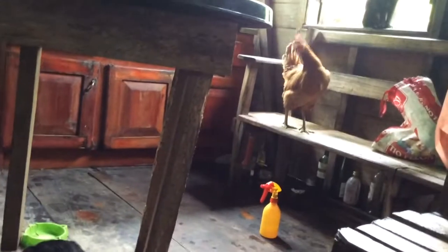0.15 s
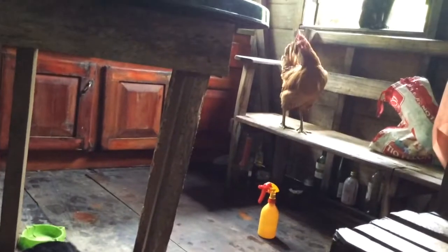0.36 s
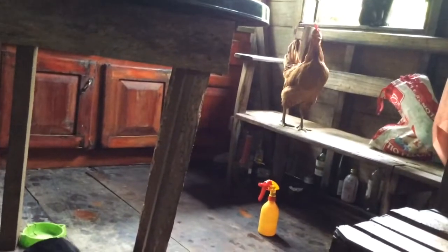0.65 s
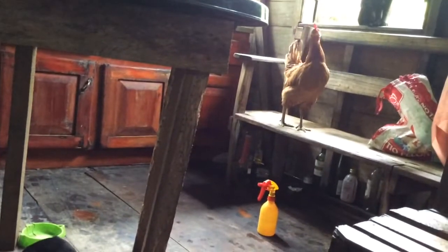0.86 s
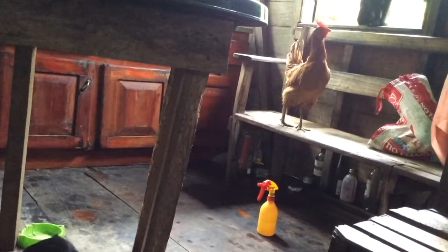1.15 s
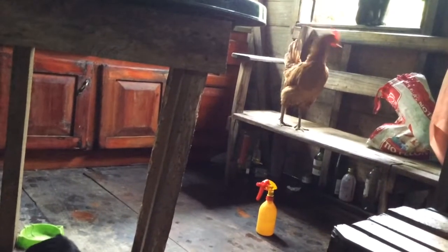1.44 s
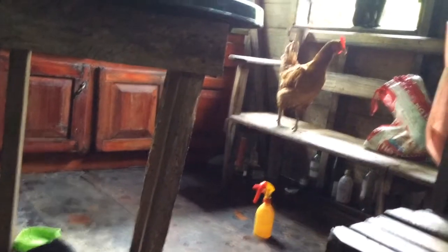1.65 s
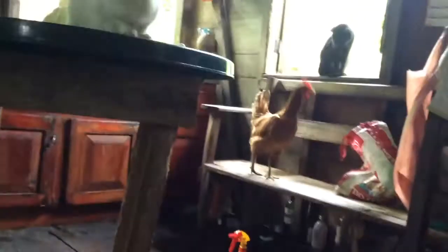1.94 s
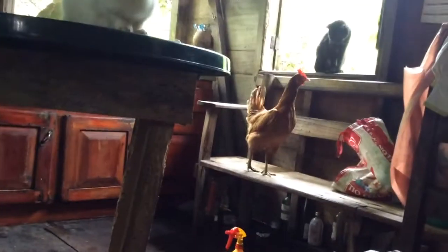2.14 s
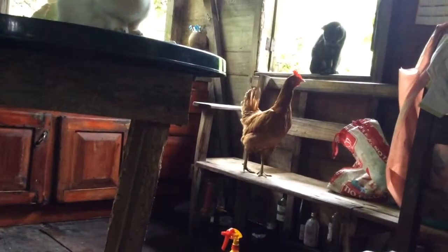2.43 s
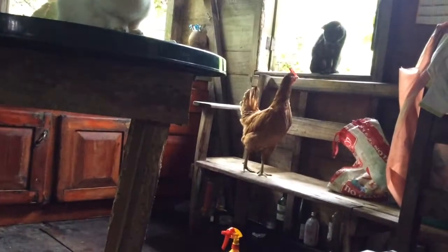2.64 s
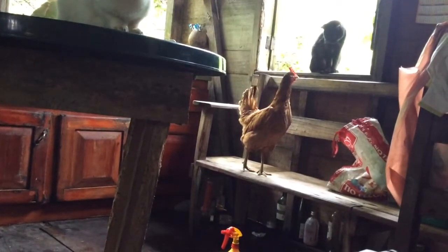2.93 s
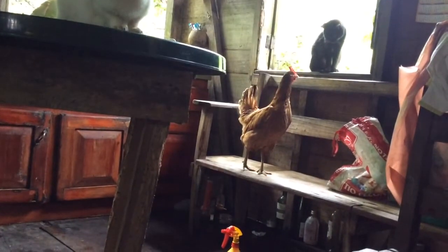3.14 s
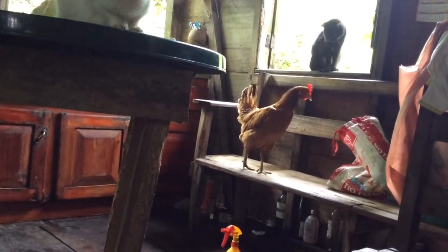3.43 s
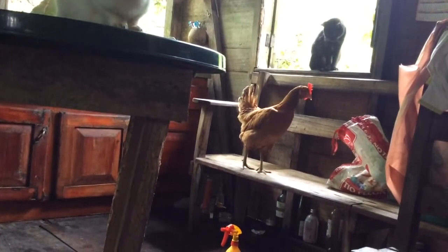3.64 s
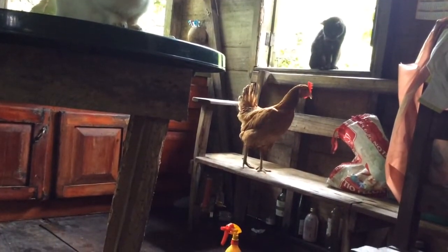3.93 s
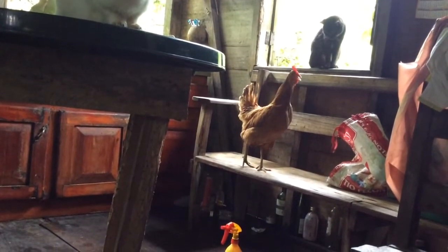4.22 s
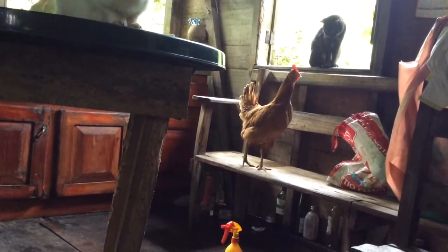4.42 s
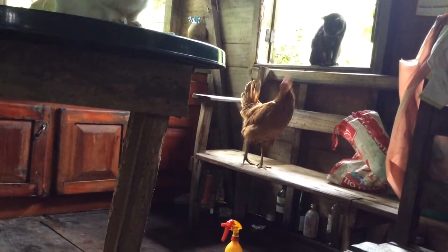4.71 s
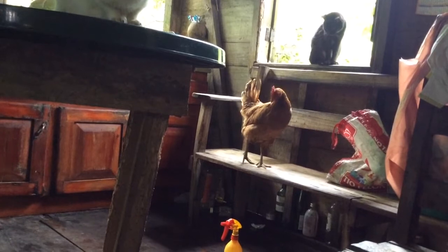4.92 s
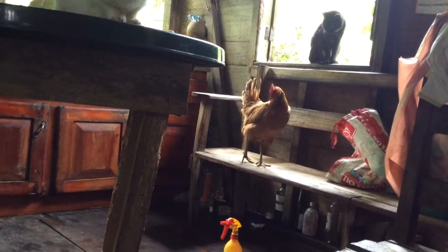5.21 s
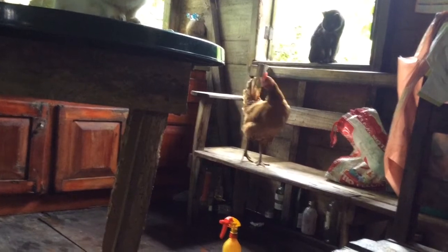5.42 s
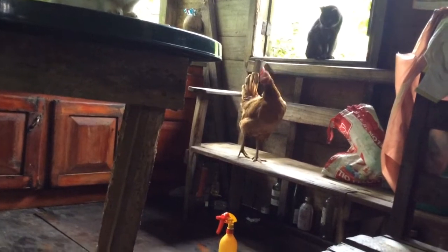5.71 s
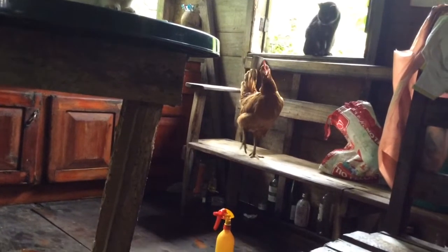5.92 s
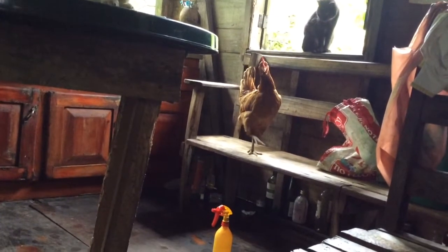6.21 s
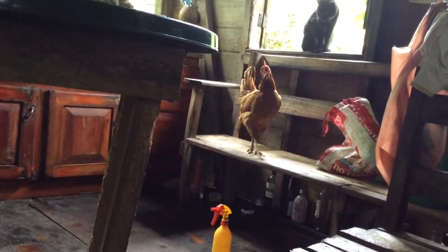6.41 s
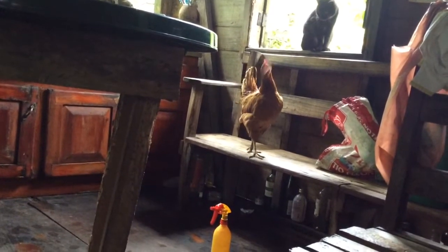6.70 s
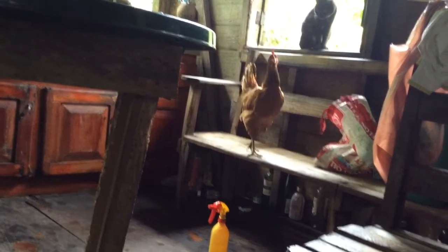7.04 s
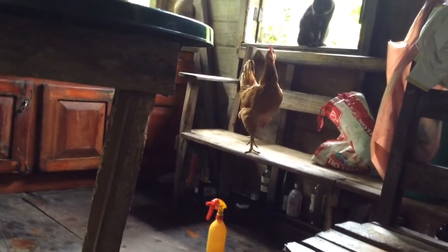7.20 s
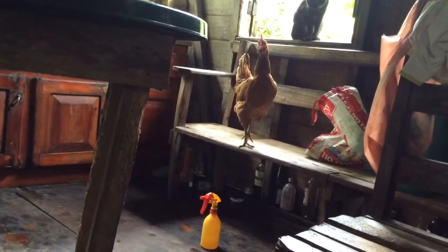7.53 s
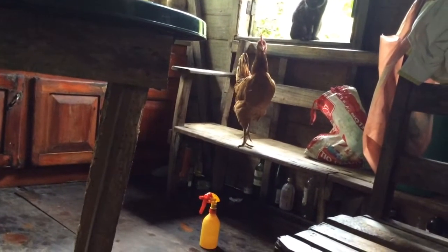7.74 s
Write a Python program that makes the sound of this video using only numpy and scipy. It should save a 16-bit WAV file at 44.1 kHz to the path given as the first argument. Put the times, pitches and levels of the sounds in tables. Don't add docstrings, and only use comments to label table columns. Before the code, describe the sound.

Short, throaty hen clucks at a few steps' distance, two harsh high squawks, and a brief room ring over faint low hum.

```python
import sys
import numpy as np
from scipy import signal
from scipy.fft import rfft, irfft, next_fast_len
from scipy.io import wavfile
from scipy.ndimage import uniform_filter1d, map_coordinates

SR = 44100
rng = np.random.default_rng(int(sys.argv[2]) if len(sys.argv) > 2 else 0)


def store_pcm(level_fs):
    pcm = np.round(np.clip(level_fs, -1, 1) * 32767).astype(np.int16)
    wavfile.write(sys.argv[1], SR, np.atleast_2d(pcm).T)


def amplitude_ratio(level_db):
    exponent = np.asarray(level_db, float) / 20
    return 10 ** exponent


N = 347067

# (frequency [Hz], level [dB per Hz])
HUSH_SPECTRUM = [(74, -31), (125, -3.5), (244, -2.5), (275, -5.5), (324, -5), (671, -1), (773, -6),
                 (909, -8.5), (1110, -5.5), (1570, -12.5), (2000, -11.5), (4070, -13.5), (5740, -16.5),
                 (13700, -17), (15800, -43)]
# (frequency [Hz], level [dB per Hz])
RUMBLE_SPECTRUM = [(15, -57.5), (30, -21), (81, -3.5), (130, -15), (170, -20), (290, -120)]
# (start [s], length [s], level [dB], pitch [Hz])
DRONE_SWELLS = [(0.138, 0.11, -59, 104), (.6, 0.16, -59, 101), (1.045, 0.8, -60.5, 98),
                (1.551, .24, -56, 101), (1.988, .2, -57.5, 104), (2.54, 0.2, -55.5, 101),
                (2.933, 0.2, -53, 102), (4.35, 0.27, -59, 101), (4.846, .2, -59, 102.3),
                (5.32, 0.7, -52, 101.5), (5.364, 0.63, -56, 65.7), (6.2, .22, -54, 102.7),
                (7.2, 0.79, -58.5, 81.3)]
# (frequency [Hz], time to fall by 60 dB [s])
KITCHEN_RING = [(250, 0.34), (600, 0.19), (1100, 0.25), (3500, 0.23), (10000, 0.25)]
# (time [s], level [dB], pitch [Hz], length [s], beak opening [dB])
CLUCKS = [(0.168, -33.5, 316.6, .055, -1.2), (0.417, -24.5, 351.4, .041, -4.5),
          (0.862, -30, 292.1, 0.052, 2.5), (2.009, -40.5, 198.1, 0.052, -5),
          (2.238, -39, 242.5, 0.055, 1.6), (2.532, -36.5, 254.5, 0.049, -1),
          (2.764, -31.5, 324.4, 0.044, -0.5), (3.002, -36, 263.4, 0.051, -1),
          (3.251, -30, 334.2, 0.04, -0.2), (3.506, -30.5, 376.2, 0.051, 0),
          (3.797, -27.5, 378.9, 0.054, 1.2), (4.035, -24.5, 388, 0.048, 0.5), (4.445, -31, 300.6, 0.06, 2),
          (5.448, -42.5, 294.4, .056, 0), (5.705, -38, 235.6, 0.054, -3), (5.937, -29.5, 324.3, 0.043, 0.6),
          (6.153, -28, 342.2, .029, -1.5), (6.332, -25.5, 354.2, 0.047, 1.5), (6.554, -26.5, 369, 0.047, 2),
          (6.779, -25, 348, 0.046, 0.9), (7.028, -25.5, 383.3, 0.049, 2), (7.256, -23.5, 379.5, 0.052, 2.5),
          (7.499, -24.5, 371.5, .045, 3), (7.719, -24, 366.7, 0.044, 2)]
# (frequency [Hz], gain [dB])
CLUCK_THROAT = [(150, -37.5), (240, -10), (400, -17.5), (700, 3), (880, -4.5), (1130, 2), (1350, -10.5),
                (1600, -24.5), (3000, -25), (5000, -30.5), (6000, -40), (9000, -31.5), (12500, -40),
                (15000, -42)]
# (frequency [Hz], rise with pitch [Hz per Hz], scatter [0-1], level [dB],
# growth with length [dB per s])
NECK = [(1766, 3, 0.05, -16, 104), (2976, -1.9, .05, -18, 101), (3823, .3, 0.06, -24, 750)]
# (time [s], pitch [Hz], effort [dB], throat ring [dB])
SQUAWKS = [
    [(0.524, 513, -22, -12), (0.538, 562.3, -20, -0.5), (0.558, 570.3, -29, 15), (0.59, 505.2, -21, -12),
     (0.655, 490, -23, -4.5), (0.71, 525, -36, 0), (0.765, 525, -36.5, 7.5), (0.795, 524.7, -32.5, -3),
     (0.862, 515.7, -37.5, 14)],
    [(4.145, 509, -22, -23), (4.156, 554, -21.5, -0.5), (4.174, 551.4, -24.5, 11.5),
     (4.205, 541.4, -19.5, -13), (4.235, 526, -23, -8.5), (4.28, 535.8, -20, -11),
     (4.315, 531.5, -26.5, 1.5), (4.36, 529.8, -29.5, -7), (4.445, 527.3, -32, -2.5)],
]
# (frequency [Hz], gain [dB])
SQUAWK_THROAT = [(530, -19), (800, -17.5), (1060, -10.5), (1550, -19), (2120, -4.5), (2400, -19.5),
                 (2700, -22), (3200, -6.5), (3700, -17.5), (4300, -4.5), (5100, -25), (5700, -18),
                 (11600, -22.5), (15500, -31)]
# (lowest [Hz], highest [Hz])
SQUAWK_BANDS = [(420, 680), (680, 1300), (1300, 2400), (2400, 16000)]
# (share at full effort [dB], change with effort [dB per dB],
# change with throat ring [dB per dB])
BAND_SHARES = [(-13, 0.95, 0.47), (-0.1, 0.96, 1.1), (-0.45, 1.13, 0.16), (-4, 0.62, 0.39)]
# (time [s], level [dB], rise [s],
# time to fall by 60 dB [s], brightest frequency [Hz])
THUDS = [(1.47, -54, 0.025, 0.17, 500), (1.583, -52, 0.0011, 0.06, 1154), (1.65, -65, 0.008, 0.23, 4800),
         (2.262, -45, 0.0062, 0.085, 160), (3.37, -58, 0.054, 0.73, 1130), (3.4, -58, 0.049, 0.21, 220),
         (3.58, -52, 0.037, 0.47, 1070), (4.555, -40, 0.013, 0.39, 316), (4.89, -48, 0.033, 0.23, 269),
         (5.25, -57.5, 0.045, 0.24, 276), (6.175, -50, .002, .04, 907.2)]


def unit(x):
    return x / np.sqrt(np.mean(x ** 2) + 1e-20)


def along(points, hz):
    f, v = np.transpose(points)
    return np.interp(np.log(hz + 1), np.log(f + 1), v)


def wobble(size, rate):
    knots = rng.standard_normal(int(size * 2000 / SR) + 4)
    return map_coordinates(knots, [np.arange(size) * np.clip(rate, 0, 2000) / SR])


def coloured(x, spectrum):
    m = next_fast_len(len(x) + 4096)
    gain = amplitude_ratio(spectrum(np.fft.rfftfreq(m, 1 / SR)))
    return irfft(rfft(x, m) * gain, m)[:len(x)]


def add(track, s, x):
    part = track[round(s * SR):][:len(x)]
    part += x[:len(part)]


def room_hush():
    z = signal.stft(rng.standard_normal(N), nperseg=512)[2]
    patches = uniform_filter1d(uniform_filter1d(rng.standard_normal(z.shape), 6, 0), 8, 1)
    patchy = signal.istft(z * amplitude_ratio(3.3 * unit(patches)), nperseg=512)[1][:N]
    level_db = -57 + 1.5 * wobble(N, 1.635)
    return amplitude_ratio(level_db) * unit(coloured(patchy, lambda f: along(HUSH_SPECTRUM, f)))


def low_rumble():
    level_db = -64 + 1.7 * wobble(N, 3.98)
    deep = coloured(rng.standard_normal(N), lambda f: along(RUMBLE_SPECTRUM, f))
    return amplitude_ratio(level_db) * unit(deep)


def drone():
    t = np.arange(N) / SR
    warped_s = np.cumsum(1 + 0.0247 * wobble(N, 7.5)) / SR
    murmur_db = -70.5 + 3.7 * wobble(N, 7.8)
    out = amplitude_ratio(murmur_db) * np.sin(2 * np.pi * 120.0 * warped_s)
    for s, length, db, hz in DRONE_SWELLS:
        swell = np.sin(np.pi * np.clip((t - s) / length, 0, 1)) ** .8
        out += amplitude_ratio(db) * swell * np.sin(2 * np.pi * hz * warped_s)
    return out * amplitude_ratio(1.5 * wobble(N, 5.9))


def voice(pitch_hz, throat, hoarse, pairing, jitter, flutter_db, hiss_db, top_hz):
    size = len(pitch_hz)
    pitch_hz = pitch_hz * (1 + jitter * hoarse * wobble(size, 261.3) + 0.0047 * wobble(size, 60.35))
    cycle = 2 * np.pi * np.cumsum(pitch_hz) / SR
    k = np.arange(1, top_hz // pitch_hz.max() + 1)[:, None]
    flutter = np.array([wobble(size, 29.5) for _ in k])
    strength = amplitude_ratio(throat(k * pitch_hz) + flutter_db * flutter)
    tone = np.sum(strength * np.sin(k * cycle + rng.uniform(0, 2 * np.pi, k.shape)), axis=0)
    tone *= 1 + pairing * np.cos(cycle / 2)
    gate = (1 + np.cos(cycle)) ** 2
    air = coloured(gate * rng.standard_normal(size), lambda f: throat(f) + hiss_db * np.log2(f / 2000 + 1))
    share = np.clip(hoarse, 0, 1)
    return np.sqrt(1 - share ** 2) * unit(tone) + share * unit(air)


def kitchen(x, wet_db):
    hz, t, z = signal.stft(rng.standard_normal(SR // 2), SR, nperseg=256)
    fading = z * amplitude_ratio(-60 * t / along(KITCHEN_RING, hz)[:, None])
    tail = signal.istft(fading, SR, nperseg=256)[1]
    tail *= 1 - np.exp(-np.arange(len(tail)) / SR / 0.0019)
    out = amplitude_ratio(wet_db) * signal.fftconvolve(x, tail / np.linalg.norm(tail))
    out[:len(x)] += x
    return out


def neck_peaks(db, hz, length):
    usual_db, usual_s, usual_hz = -30, .048, 320
    lift_db = -0.12 * (db - usual_db)
    peaks = []
    for centre, rise, scatter, top_db, grows in NECK:
        peak_hz = (centre + rise * (hz - usual_hz)) * (1 + scatter * rng.normal())
        peak_db = top_db + lift_db + grows * (length - usual_s) + 4.5 * rng.normal()
        peaks.append((peak_hz, peak_db))
    return peaks


def clucks():
    out = np.zeros(N)
    hum_hz, neck_width_hz = 223.1, 230
    for s, db, hz, length, open_db in CLUCKS:
        hoarse = 0.447 + 20 * (length - .048)
        neck = neck_peaks(db, hz, length)
        u = np.linspace(0, 1, round((0.02954 + 1.25 * np.clip(length, .02, .1)) * SR))
        push = np.sin(np.pi * u ** 1.3) ** 2
        beak = 1 / (1 + np.exp((.37 - u) / 0.0641))
        pitch_hz = hum_hz + (hz - hum_hz) * beak
        pipe_hz = 1890 * rng.uniform(0.853, 1.1)

        def throat(f):
            mouth = amplitude_ratio(along(CLUCK_THROAT, f) + open_db * np.tanh(3 * np.log2((f + 1) / 880)))
            peaks = sum(amplitude_ratio(top_db) / (1 + (2 * (f - c) / neck_width_hz) ** 2) for c, top_db in neck)
            pipe_db = 4 * np.cos(2 * np.pi * f / pipe_hz) * (f > 4400)
            return 20 * np.log10(mouth + peaks) + pipe_db

        noise_share = np.clip(0.821 * hoarse, .15, 1) + 0.29 * (1 - beak)
        call = voice(pitch_hz, throat, noise_share, pairing=0.12, jitter=0.0993,
                     flutter_db=1.64, hiss_db=0.9, top_hz=8800)
        muffled = coloured(call, lambda f: -14 * np.clip(np.log2((f + 1) / 650), 0, 9))
        cluck = amplitude_ratio(db + 0.65) * push * (beak * call + 1.08 * (1 - beak) * muffled)
        add(out, s - .027, kitchen(cluck, wet_db=-3.5))
    return out


def squawks():
    out = np.zeros(N)
    full_db = -28
    for rows in SQUAWKS:
        s, *cols = np.transpose(rows)
        t = np.arange(0, s[-1] - s[0], 1 / SR)
        pitch_hz, effort_db, ring_db = (np.interp(t + s[0], s, c) for c in cols)
        burst = np.exp(-t / 0.012)
        hoarse = 0.093 + (0.37 - 0.093) * np.exp(-t / .11) + 0.48 * burst
        call = voice(pitch_hz, lambda f: along(SQUAWK_THROAT, f), hoarse, pairing=0.04 + 0.9 * burst,
                     jitter=0.0576, flutter_db=2.5, hiss_db=5.0, top_hz=15200)
        mix = np.zeros(len(t))
        for (lo, hi), (db, follows, rings) in zip(SQUAWK_BANDS, BAND_SHARES):
            part = unit(coloured(call, lambda f: -40 * ((f < lo) | (f >= hi))))
            mix += amplitude_ratio(db + follows * (effort_db - full_db) + rings * ring_db) * part
        fade_in = np.clip(t / 0.0062, 0, 1) ** 2
        fade_out = np.clip((t[-1] - t) / 0.0053, 0, 1)
        add(out, s[0], kitchen(amplitude_ratio(full_db - 2.0) * fade_in * fade_out * mix, wet_db=-3.0))
    return out


def thuds():
    out = np.zeros(N)
    t = np.arange(SR // 2) / SR
    for s, db, rise, t60, hz in THUDS:
        fall_db = 43 if hz > 1000 else 7.5
        noise = rng.standard_normal(len(t))
        puff = unit(coloured(noise, lambda f: -fall_db * np.abs(np.log2((f + 20) / hz))))
        add(out, s, amplitude_ratio(db + 9.5 - 60 * t / t60) * (1 - np.exp(-t / rise)) ** 1.2 * puff)
    return out


def scene():
    return (room_hush() + low_rumble() + drone() + clucks() + squawks() + thuds())[None]


def band_limit(x):
    return signal.sosfilt(signal.butter(12, 16440, fs=SR, output="sos"), x)


def record(dry):
    mix = coloured(dry[0], lambda f: -80 * (f > 15800))[None]
    return band_limit(mix)


dry = scene()
out = record(dry)
store_pcm(out)
```